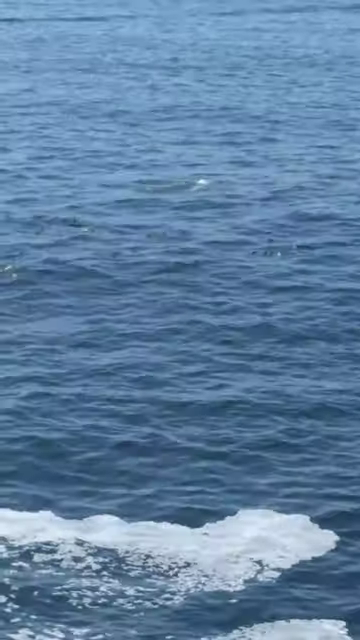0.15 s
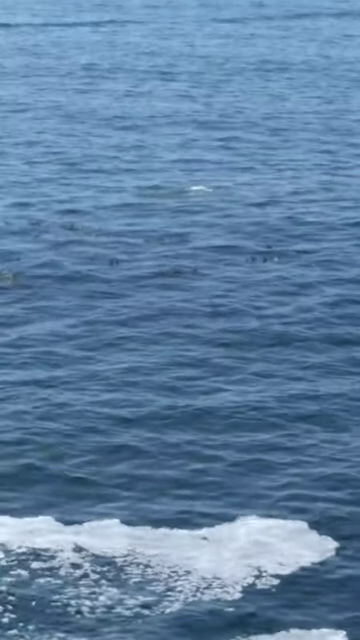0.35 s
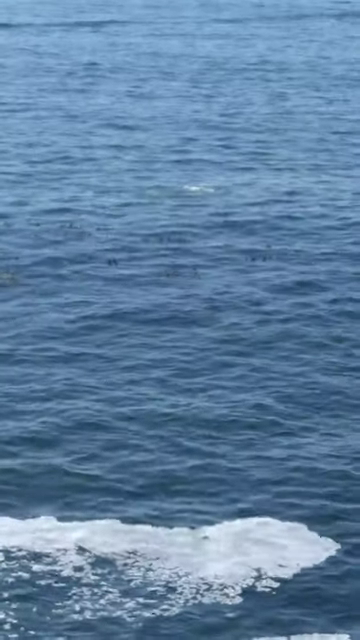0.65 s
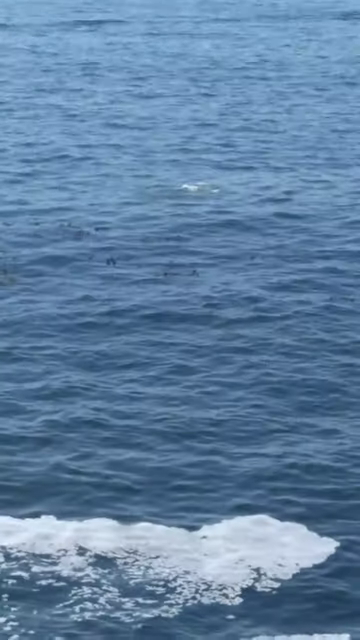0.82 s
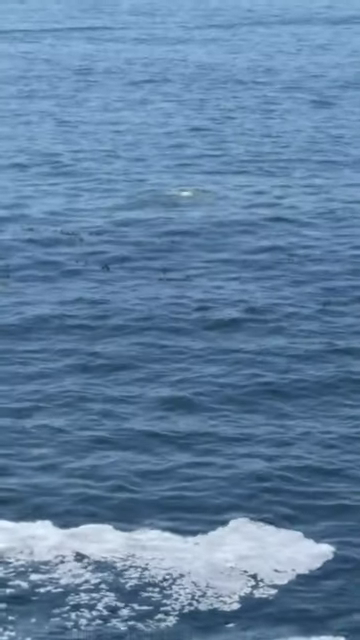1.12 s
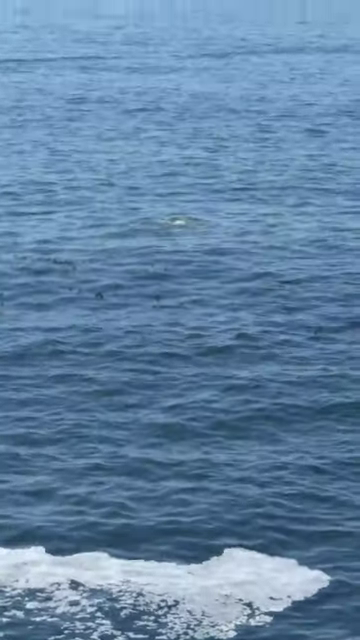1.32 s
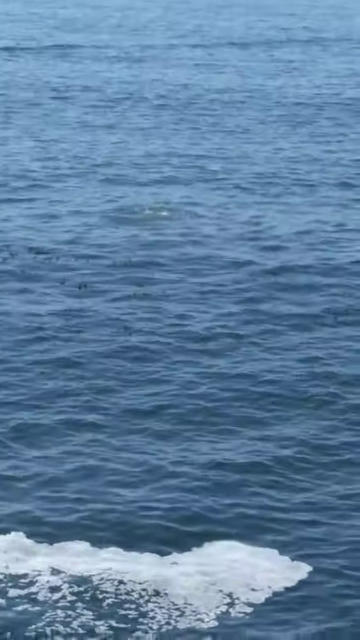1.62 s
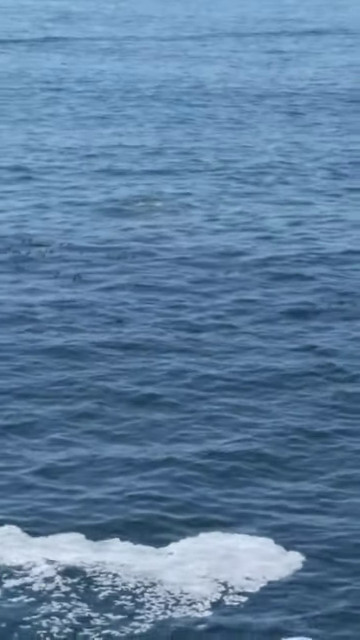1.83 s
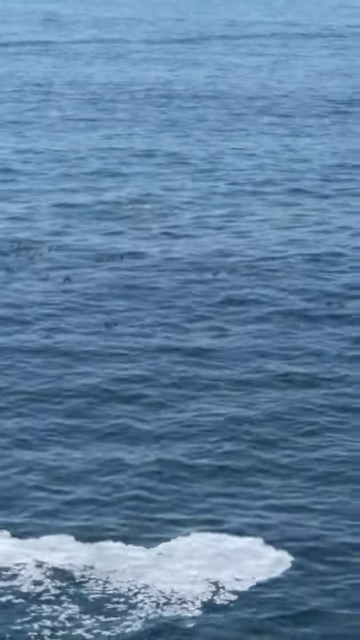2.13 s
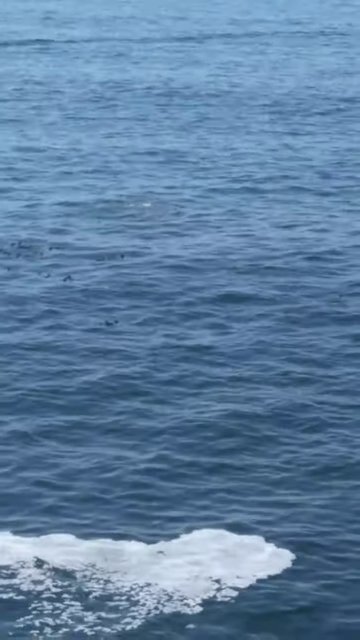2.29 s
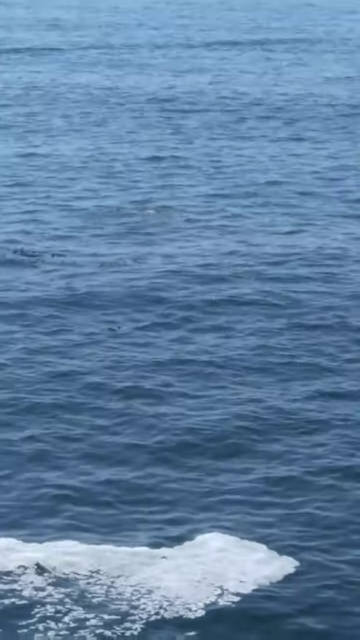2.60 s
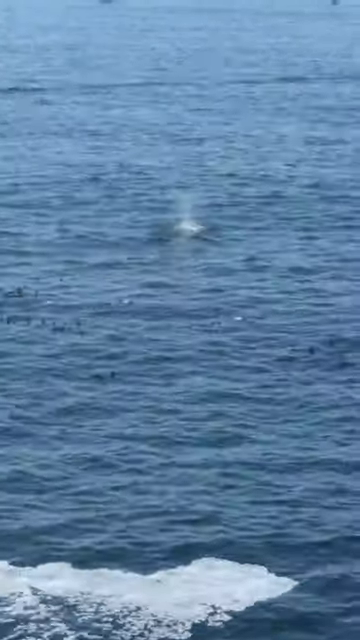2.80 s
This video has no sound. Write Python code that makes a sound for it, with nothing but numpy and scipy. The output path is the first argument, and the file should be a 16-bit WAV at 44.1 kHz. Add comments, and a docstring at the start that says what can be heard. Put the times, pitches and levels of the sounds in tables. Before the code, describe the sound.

A low wavering motor-like drone dominates the first second, then falls to a faint hum under dull sea wash, fizzing foam, hollow sloshes and a few soft thuds, outdoors by the shore, close stereo microphone.

```python
"""Sea below a shore, at two close microphone ports: silence, then a quick fade-in. From the start: engine drone
(wavering orders of its cycle over rumble noise), loud for about a second, then far fainter; wash (patchy dull
noise) and foam (patchy hiss plus random pops) in small swells. From 0.5 s: hollow sloshes (noise on a sinking
pitch). From 1 s: soft bumps (decaying sines). From 1.3 s: a faint burst of spray (decaying hiss with lingering
narrow bands); at 2.7 s a stronger burst of hiss with a bump."""
import sys
import numpy as np
from scipy import signal
from scipy.fft import rfft, irfft, next_fast_len
from scipy.io import wavfile
from scipy.ndimage import uniform_filter1d, map_coordinates

SR = 44100
rng = np.random.default_rng(int(sys.argv[2]) if len(sys.argv) > 2 else 0)


def persist_wave(psi):
    """Save psi, clipped to +-1, as 16-bit WAV."""
    counts = np.round(np.clip(psi, -1, 1) * 32767).astype(np.int16)
    wavfile.write(sys.argv[1], SR, np.atleast_2d(counts).T)


N = 130095

# fade-in and band limit
START_S, START_GAIN, FADE_S, FADE_POWER = 0.177, 0.057, 0.25, 0.98
TOP_HZ = 15350

# microphone ports, likeness of left and right: f/Hz, likeness/1 (clipped to 0-1)
PORT_LIKENESS = [(100,0.7),(500,1.1),(1000,0.6),(1800,0.85),(2500,3.5),(3100,0.68),(4000,0.26),(9000,0.47),(14000,0.16)]
# microphone ports, phase by which left leads: f/Hz, lead/rad
PORT_LEAD_RAD = [(0,-1),(400,0.41),(950,0.5),(1640,0.9),(1980,1.5),(2500,1.16),(2950,2.5),(3300,3.5),(4220,3),(6000,4.5),(7500,6.5),(8800,6.5),(10000,8.5),(12800,12),(15000,16)]
# wash, balance of the ports: f/Hz, left minus right/dB
WASH_BALANCE_DB = [(100,-1.2),(400,-1),(700,-1.5),(1280,2),(2400,-1.5)]
# reflections: longest delay, summed level against the direct sound
ECHO_SPREAD_S, ECHO_DB = 0.012, -7

# engine working cycle: t/s, rate/Hz
CYCLE_RATE_HZ = [(0.2, 16.1), (0.57, 16.0), (0.77, 16.2), (1.51, 16.4), (1.64, 16.6), (2.22, 16.7),
                 (2.66, 15.8), (2.77, 16.0), (2.95, 15.1)]
# engine drone: t/s, level/dB
DRONE_LEVEL_DB = [(.18,-33.5),(.33,-34),(.47,-34.5),(.62,-34),(.75,-36),(.87,-33.5),(0.99,-34.5),(1.06,-46),(1.2,-50),(1.6,-50),(2.3,-48.5),(2.55,-46),(2.67,-50),(2.71,-57),(2.87,-60),(2.95,-66)]
# engine orders: multiple of the cycle rate/1, level/dB
ENGINE_ORDERS_DB = [(3,-24),(4,-13),(5,2),(6,-4.5),(7,-14.5),(8,-3),(9,-12),(10,-7.5),(11,-21.5),(12,-21),(13,-27),(14,-26),(16,-25),(17,-27)]
# engine, upper orders against low ones: t/s, level/dB
UPPER_ORDERS_DB = [(.18,5.5),(.3,0.5),(.44,2.5),(.52,1),(.63,-10),(.72,-.5),(.79,-4.5),(.87,1.5),(1.02,3),(1.15,3.5),(1.35,0),(1.52,-8.5),(1.85,1),(2.1,2),(2.55,-2),(2.9,5)]
# engine rumble spectrum: f/Hz, level/dB per Hz
RUMBLE_SPECTRUM_DB = [(20,-14),(38,-15),(60,-14),(100,7.5),(150,1),(230,1),(300,-15.5),(450,-69),(1000,-85)]
# engine rumble against the hum: t/s, level/dB
RUMBLE_TO_HUM_DB = [(.2,-13.5),(.42,-13.5),(.58,-8.5),(.8,-10.5),(1.1,-7.5),(1.6,-13.5),(2.1,-9.5),(2.9,-16)]
FIRST_UPPER_ORDER = 8
ORDER_WAVER_DB, SHUDDER_DB, RUMBLE_SIDE_DB = 1.1, 0.6, -11

# wash spectrum: f/Hz, level/dB per Hz
WASH_SPECTRUM_DB = [(20,-17),(60,8),(200,-0.5),(340,0),(450,-1.5),(600,-1.5),(800,-3.5),(1100,-4),(1500,-8),(2000,-9),(2600,-16),(4000,-27),(9000,-40)]
# wash: t/s, level/dB
WASH_LEVEL_DB = [(.18,-55.5),(.5,-54),(.75,-53.5),(1.1,-54.5),(1.5,-54.3),(1.9,-55),(2.25,-53.5),(2.55,-55),(2.8,-53),(2.95,-54)]

# foam colour at the ports: f/Hz, left/dB, right/dB
FOAM_COLOUR_DB = [(2810, -4.5, -1), (3930, -2, -4.5), (5400, -3.5, -6), (6850, -3.5, -4.5), (7970, 0.5, -4),
                  (9670, -6.5, 2.5), (10800, -6, -3.5), (12800, -12.5, -13.5), (14500, -20, -18)]
# foam: t/s, level/dB
FOAM_LEVEL_DB = [(.18,-56.5),(.45,-57.5),(.6,-58.5),(.92,-54.5),(1.07,-57.5),(1.14,-57),(1.28,-57.5),(1.31,-55.5),(1.42,-55.5),(1.55,-59),(1.77,-59.5),(2.0,-57.5),(2.15,-57),(2.26,-54),(2.34,-55.5),(2.5,-58.5),(2.64,-55.5),(2.95,-55)]
FOAM_LOW_HZ, BUBBLES_PER_S, BUBBLE_DB = 2970, 1000, -6

# sloshes: centre t/s, half length/s, pitch at centre f/Hz, level/dB
SLOSH_EVENTS = [(0.506,0.031,500,-62),(2.18,0.16,615,-59.5),(2.175,0.011,645,-54.5),(2.225,0.013,645,-52),(2.29,0.013,540,-55),(2.36,0.044,500,-62),(2.428,0.072,599.4,-63.5)]
SLOSH_WIDTH = 0.13  # of the pitch
SLOSH_SAG_PER_S = 0.7  # natural log of the pitch lost a second

# bumps: onset t/s, level/dB, pitch f/Hz, t60/s
BUMP_EVENTS = [(1.002,-28.5,96,0.19),(2.681,-35,50,0.045),(2.888,-44.5,150,0.2),(2.89,-46,79,0.27)]
BUMP_ATTACK_S = 0.0032

# bursts of hiss, the first from spray: onset t/s, level/dB, t60/s
HISS_BURSTS = [(1.296,-55,0.6),(2.681,-48,0.67)]
# spray colour at the ports: f/Hz, left/dB, right/dB
SPRAY_COLOUR_DB = [(990, 4, -2), (2500, -4.5, -5.5), (3500, -15, -12), (4300, 1.5, -14), (4840, 1, -12),
                   (5300, -4.5, -19), (6100, -17, -13), (7500, -3, -3), (8140, -1, -12), (8700, 6, -2),
                   (10400, -13, 0), (12500, -17, -12), (14300, -10.5, -26)]
# lingering bands in the spray: centre f/Hz, half width/Hz, level/dB
LINGERING_BANDS = [(4410,165,0),(5320,150,-2.5),(7900,97,-8),(8170,110,3)]
SPRAY_LOW_HZ, SPRAY_ATTACK_S = 2600, 0.0036
BANDS_DB, BANDS_T60_RATIO = -7.5, 3.4  # against the hiss
BANDS_LEFT_DB = 6  # left minus right


def amp(db):
    """Decibels to gain."""
    return 10 ** (np.asarray(db) / 20)


def unit(x):
    """Scaled to rms 1."""
    return x / np.sqrt(np.mean(x ** 2) + 1e-20)


def clock():
    """Time of each sample, s."""
    return np.arange(N) / SR


def along(points, hz, axis=1):
    """One column of a table by frequency, interpolated on a log axis."""
    p = np.transpose(points)
    return np.interp(np.log(hz + 1), np.log(p[0] + 1), p[axis])


def curve(rows):
    """(t, value) rows as one value per sample."""
    return np.interp(clock(), *np.transpose(rows))


def wobble(knots_per_s):
    """Smooth random curve through normal knots."""
    return map_coordinates(rng.standard_normal(512), [clock() * knots_per_s], mode="wrap")


def filtered(x, response):
    """x times a response of frequency, by zero-padded FFT."""
    m = next_fast_len(N + SR // 2)
    return irfft(rfft(x, m) * response(np.fft.rfftfreq(m, 1 / SR)), m)[..., :N]


def patchy(depth_db):
    """Two unrelated noises sharing random gain patches in time and frequency."""
    z = signal.stft(rng.standard_normal((2, N)), nperseg=512)[2]
    field = rng.standard_normal(z.shape[1:])
    field = uniform_filter1d(field, size=6, axis=0)  # across frequency
    field = uniform_filter1d(field, size=16, axis=1)  # across time
    noise = signal.istft(z * amp(depth_db * unit(field)), nperseg=512)[1]
    return unit(noise[:, :N])


def ports(pair, colour):
    """Two unrelated signals mixed to the ports' likeness and phase lead, coloured, rms 1."""
    def mid_side_gains(hz):
        turn = np.arccos(np.clip(along(PORT_LIKENESS, hz), 0, 1)) / 2
        return np.array([np.cos(turn), np.sin(turn)])

    def lead(hz):
        lead_rad = np.interp(hz, *np.transpose(PORT_LEAD_RAD))
        return np.exp(np.outer([.5j, -.5j], lead_rad))

    mid, side = filtered(pair, mid_side_gains)
    left_right = np.array([mid + side, mid - side])
    return unit(filtered(left_right, lambda hz: colour(hz) * lead(hz)))


def hiss_colour(table, low_hz):
    """Left and right gains of a hiss that falls away below low_hz."""
    def colour(hz):
        high_pass = hz ** 3 / np.hypot(hz ** 3, low_hz ** 3)
        return amp([along(table, hz, axis=1), along(table, hz, axis=2)]) * high_pass
    return colour


def echoes(x):
    """Weak reflections from nearby surfaces: eight random delays per port ripple the spectrum."""
    delays_s = rng.uniform(0.002, 1, (8, 2, 1)) * ECHO_SPREAD_S

    def response(hz):
        reflected = np.exp(-2j * np.pi * hz * delays_s).sum(0) / np.sqrt(len(delays_s))
        return 1 + amp(ECHO_DB) * reflected
    return unit(filtered(x, response))


def engine():
    """Wavering orders of the working cycle, alike at both ports, over a slightly wider noise rumble."""
    turns = np.cumsum(curve(CYCLE_RATE_HZ)) / SR
    upper_db = curve(UPPER_ORDERS_DB)
    hum = 0
    for order, db in ENGINE_ORDERS_DB:
        order_db = db + (order >= FIRST_UPPER_ORDER) * upper_db + ORDER_WAVER_DB * wobble(5.18)
        hum = hum + amp(order_db) * np.sin(2 * np.pi * (order * turns + rng.random()))
    shuddering_hum = unit(hum) * amp(SHUDDER_DB * wobble(30.17))

    noise = rng.standard_normal((2, N))
    mid, side = unit(filtered(noise, lambda hz: amp(along(RUMBLE_SPECTRUM_DB, hz))))
    rumble = mid + np.outer([1, -1], amp(RUMBLE_SIDE_DB) * side)

    drone = unit(shuddering_hum + amp(curve(RUMBLE_TO_HUM_DB)) * rumble)
    return drone * amp(curve(DRONE_LEVEL_DB)) * amp([[-.2], [.2]])  # left, right


def wash():
    """Broad, dull rush of moving water: patchy noise under a falling spectrum."""
    def colour(hz):
        return amp(along(WASH_SPECTRUM_DB, hz) + np.outer([.5, -.5], along(WASH_BALANCE_DB, hz)))
    return ports(patchy(depth_db=1.5), colour) * amp(curve(WASH_LEVEL_DB) + 0.24 * wobble(19))


def foam():
    """Fine hiss dotted with bursting bubbles: random one-sample pops, high-passed with the hiss."""
    bursts = rng.random((2, N)) < BUBBLES_PER_S / SR
    pops = bursts * rng.standard_normal((2, N))
    fizz = patchy(depth_db=2.0) + amp(BUBBLE_DB) * unit(pops)
    coloured = echoes(ports(fizz, hiss_colour(FOAM_COLOUR_DB, FOAM_LOW_HZ)))
    return coloured * amp(curve(FOAM_LEVEL_DB) + 0.17 * wobble(20))


def sloshes():
    """Short swells of noise in a hollow resonance whose pitch sinks as it sounds."""
    out = 0
    for centre_s, half_s, pitch_hz, db in SLOSH_EVENTS:
        age = clock() - centre_s
        phase = 2 * np.pi * np.cumsum(pitch_hz * np.exp(-SLOSH_SAG_PER_S * age)) / SR
        width_hz = SLOSH_WIDTH * pitch_hz
        # slow noise on two quadrature carriers
        a, b = filtered(rng.standard_normal((2, 2, N)), lambda hz: 1 / (1 + (hz / width_hz) ** 2) ** 2)
        hollow = ports(a * np.cos(phase) + b * np.sin(phase), np.ones_like)
        out = out + hollow * amp(db) * np.exp(-(age / half_s) ** 2 / 2)
    return out


def bumps():
    """Dull thuds: low sines with a quick onset and exponential decay."""
    out = 0
    for onset_s, db, pitch_hz, t60_s in BUMP_EVENTS:
        age = np.maximum(clock() - onset_s, 0)
        attack = 1 - np.exp(-age / BUMP_ATTACK_S)
        out = out + amp(db - 60 * age / t60_s) * attack * np.sin(2 * np.pi * pitch_hz * age)
    return out


def spray():
    """Bursts of hiss that start quickly and die away; a few narrow bands linger."""
    hiss = echoes(ports(patchy(depth_db=1.7), hiss_colour(SPRAY_COLOUR_DB, SPRAY_LOW_HZ)))

    def narrow(hz):
        return sum(amp(db) / (1 + ((hz - centre) / width) ** 2) for centre, width, db in LINGERING_BANDS)

    bands_db = BANDS_DB + np.array([[.5], [-.5]]) * BANDS_LEFT_DB
    bands = ports(rng.standard_normal((2, N)), narrow) * amp(bands_db)
    out = 0
    for onset_s, db, t60_s in HISS_BURSTS:
        age = np.maximum(clock() - onset_s, 0)
        attack = 1 - np.exp(-age / SPRAY_ATTACK_S)
        fall_db = -60 * age / t60_s
        burst = hiss * amp(fall_db) + bands * amp(fall_db / BANDS_T60_RATIO)
        out = out + amp(db) * attack * burst
    return out


def scene():
    """Engine, sea and bumps summed at the two ports."""
    return engine() + wash() + foam() + sloshes() + bumps() + spray()


def record(dry):
    """Silence, a short fade-in from a small gain step, and the recorder's band limit."""
    age = clock() - START_S
    rise = np.clip(age / FADE_S, 0, 1) ** FADE_POWER
    fade = (age > 0) * (START_GAIN + (1 - START_GAIN) * rise)
    return filtered(dry * fade, lambda hz: hz < TOP_HZ)


dry = scene()
out = record(dry)
persist_wave(out)
```